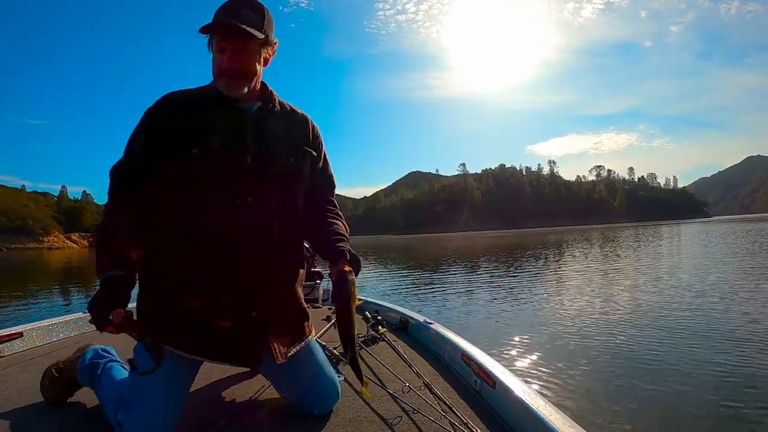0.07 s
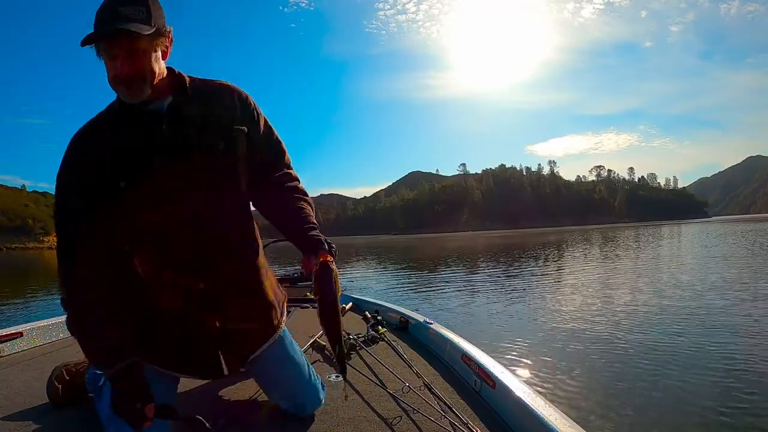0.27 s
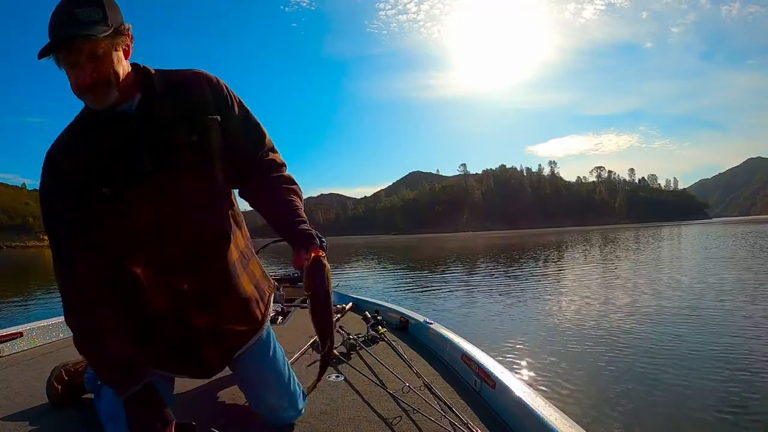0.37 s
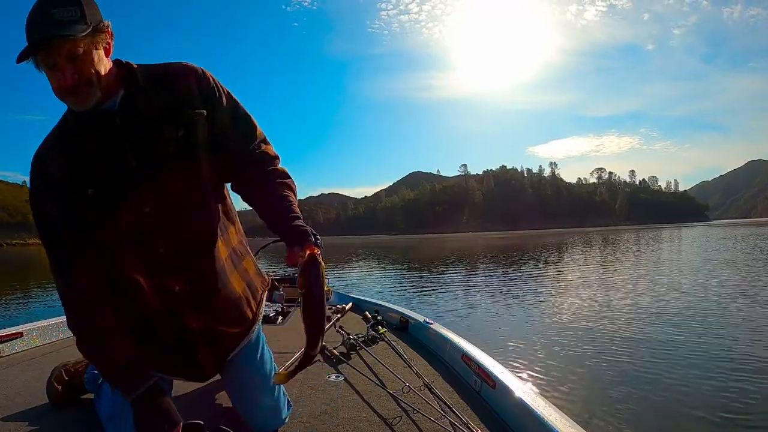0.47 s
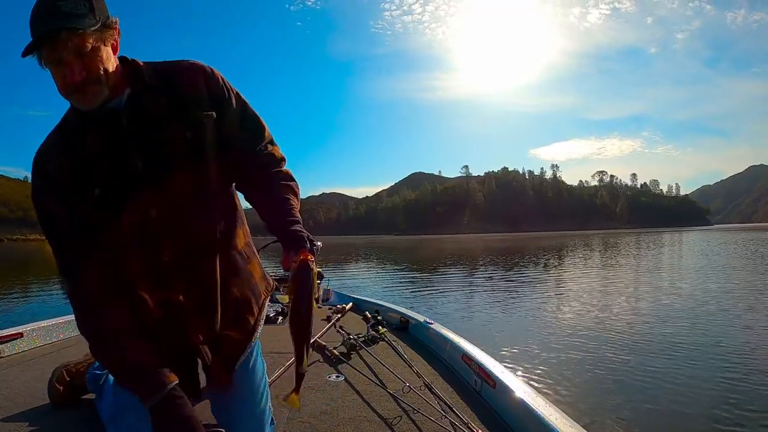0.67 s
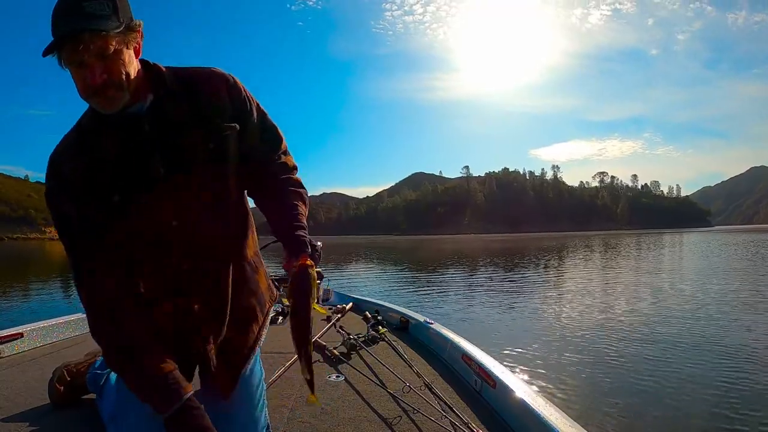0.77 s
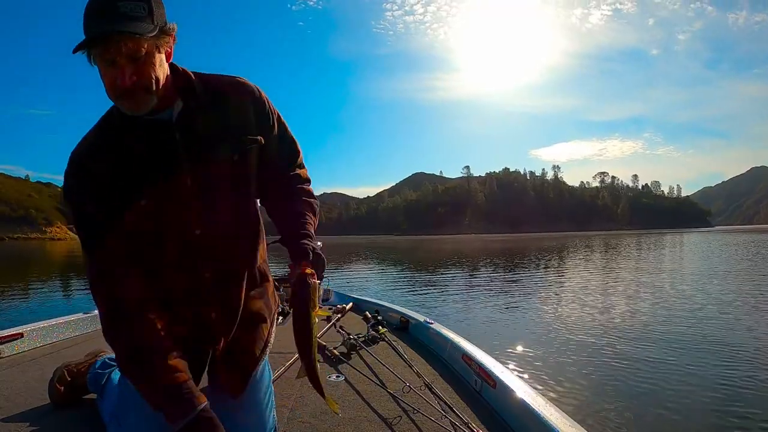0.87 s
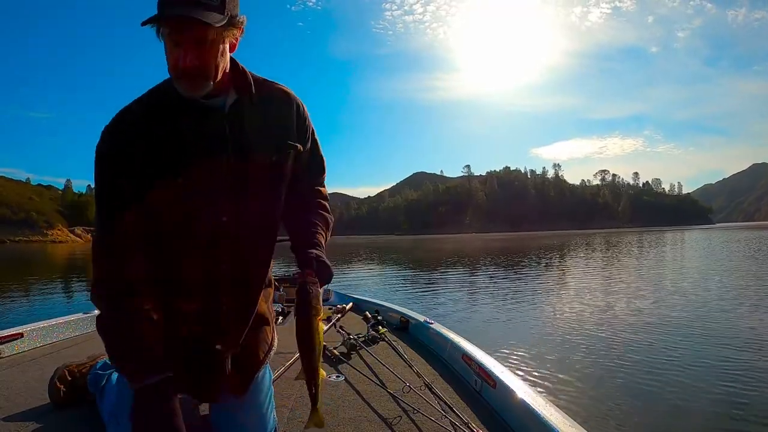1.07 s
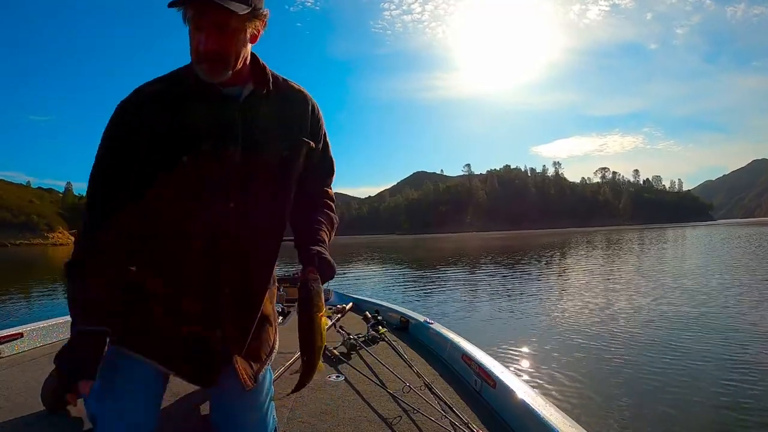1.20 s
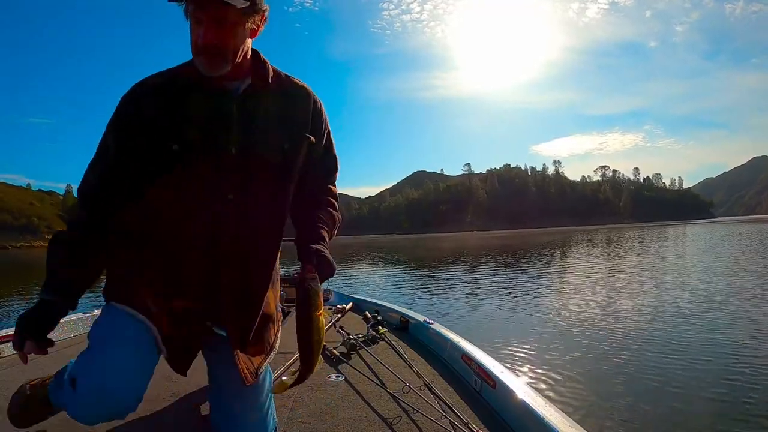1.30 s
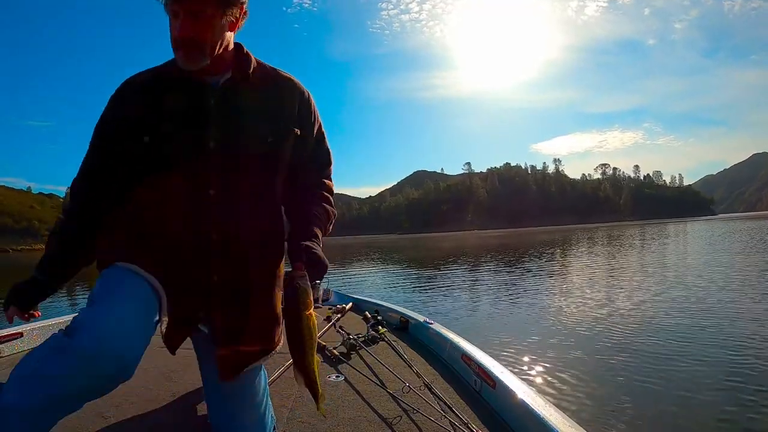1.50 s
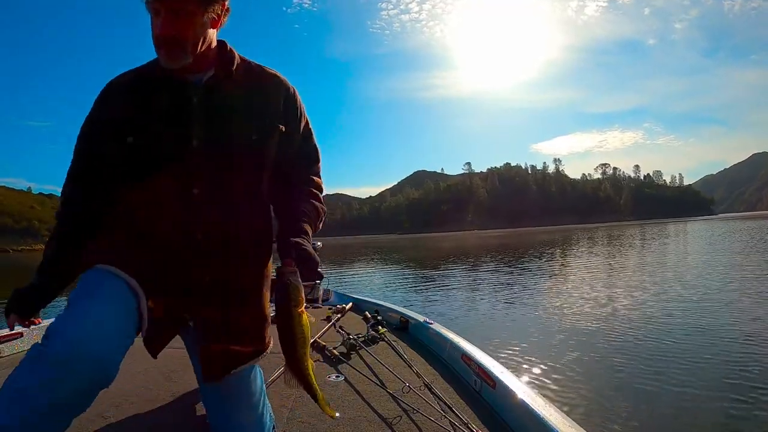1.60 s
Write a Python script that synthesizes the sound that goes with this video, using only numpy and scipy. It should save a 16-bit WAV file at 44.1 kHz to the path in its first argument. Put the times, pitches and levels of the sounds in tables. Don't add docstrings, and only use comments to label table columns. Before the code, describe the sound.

Knocks and thumps on a small boat's carpeted deck. A low thump opens, then a deep bump with a click at 0.2 s and duller knocks to 0.4. Cloth rubs around 0.4-0.6; a boot scrapes with a faint rising squeak at 0.65-0.85. After near quiet, a dropped tool cracks loudly at 1.07, bouncing with heavy thuds. Small bumps and a tick near 1.3-1.4 fade into faint lake hiss, close through the hull.

```python
import sys
import numpy as np
from scipy import signal
from scipy.fft import rfft, irfft
from scipy.io import wavfile
from scipy.ndimage import uniform_filter1d

SR = 44100
rng = np.random.default_rng(int(sys.argv[2]) if len(sys.argv) > 2 else 0)


def level_to_linear(level):
    exponent = np.asarray(level, float) / 20
    return 10 ** exponent


def digitize_waveform(pressure):
    field = np.atleast_2d(pressure).T
    bounded = np.clip(field, -1, 1)
    quanta = np.round(bounded * 32767).astype(np.int16)
    wavfile.write(sys.argv[1], SR, quanta)


N = 72765

# pitch_hz, level_db
AIR_COLOUR = [(120, -15), (190, -16.5), (860, -32), (1260, -25), (2400, -34.5), (7000, -29.5),
              (14000, -42.5)]
# pitch_hz, likeness_0_to_1
AIR_LIKENESS = [(60, 0.33), (240, 0.29), (950, 0.12), (3770, 0.63), (15000, 0.076)]
# start_s, top_s, end_s, level_db, brightness_db_per_octave
CLOTH_DRAGS = [
    (.23, .26, 0.34, -62, 3.5),
    (.3, .39, .49, -55, 1),
    (.345, .372, .42, -52.5, 1),
    (.475, .57, 0.65, -51.5, 1.5),
    (.8, .9, 0.98, -68, 2.5),
    (1.07, 1.095, 1.125, -50.5, -9),
    (1.314, 1.33, 1.39, -62.5, -0.5),
    (1.37, 1.53, 1.77, -74, 7.5),
]
# start_s, top_s, end_s, level_db, brightness_db_per_octave
BOOT_DRAGS = [
    (.14, .2, 0.35, -60, 3.5),
    (.635, .69, 0.745, -51.5, 2.5),
    (.68, .76, 0.84, -53, 0.5),
    (.9, .95, 1, -66.5, 4),
    (1.14, 1.2, 1.236, -60.5, 4.5),
    (1.285, 1.302, 1.3, -66, 0),
    (1.316, 1.328, 1.34, -57, 10.5),
]
# pitch_hz, level_db_per_hz
CLOTH_COLOUR = [(200, -6.5), (800, -3), (1300, 0), (2600, -7.5), (4200, -13.5), (6000, -11.5),
                (8000, -15.5), (13000, -17)]
# pitch_hz, level_db_per_hz
BOOT_COLOUR = [(200, 6.5), (800, -8), (1300, -1), (2600, -6), (3300, -10.5), (8600, -19), (11000, -35.5)]
# time_s, pitch_hz
SOLE_GLIDE = [(.63, 1474), (.7, 2211), (.76, 2363), (.82, 2776)]
# pitch_hz, level_db
SOLE_HOLLOW = [(2900, 0.5), (3200, -6), (3600, -2.5), (4300, 0.5)]
# start_s, peak_db, pitch_hz (minus: first
# swing down), fade_60db_s, rise_s
WEIGHT_SHIFTS = [(-.001, -36, 87.5, 0.15, 0.00022), (.033, -27.5, 90, 0.062, 0.0078),
                 (.085, -43.5, 85, 0.13, 0.0095), (.13, -58, 45, 0.51, .02), (.205, -32, -20, 0.12, 0.0031),
                 (.2255, -18.5, -26, 0.39, 0.0024), (.219, -17, 49, 0.23, 0.011),
                 (.277, -22.5, 32, 0.26, 0.01), (.295, -45.5, 109, 0.31, 0.0065),
                 (.33, -22, 44, 0.12, 0.011), (.365, -32, 68.5, 0.17, 0.0051),
                 (.41, -36, 33.5, 0.18, 0.0068), (.56, -53, 29, 0.56, 0.011), (.69, -35, 88, 0.23, 0.0085),
                 (.712, -23, 63, 0.22, 0.023), (.79, -36, 76, 0.21, 0.0062),
                 (.8405, -32, -30.5, 0.27, 0.0072), (.915, -37.5, 50, 0.073, 0.0037),
                 (.95, -52, 35.5, 0.39, 0.0085), (1.0859, -17, 79, 0.07, 0.0065),
                 (1.225, -40, 70.5, 0.12, 0.0031), (1.3, -38.5, 65, 0.1, 0.0064),
                 (1.318, -24, 46, 0.18, 0.013), (1.4, -37.5, 77, 0.054, 0.0047)]
# start_s, peak_db, pitch_hz, fade_60db_s, rise_s
LID_KNOCKS = [(.0, -43.5, 161, 0.11, 0.013), (.219, -33.5, 139, 0.19, 0.002),
              (.221, -38.5, 276, 0.066, 0.00039), (.222, -36, 428, 0.035, 0.00097),
              (.335, -33, 277, 0.071, 0.012), (.37, -39, 547, 0.055, 0.0048),
              (.26, -40.5, 219, 0.057, 0.0021), (.385, -42, 220, 0.055, 0.0022),
              (.47, -54, 106, 0.059, .004), (.59, -43, 359, 0.066, 0.0064),
              (.675, -39, 177.5, 0.11, 0.0061), (.745, -40, 227.5, 0.14, 0.0019),
              (.75, -39.5, 152.5, 0.11, 0.0035), (.82, -54.5, 164, 0.13, .004),
              (.945, -47, 338, 0.08, 0.0022), (.976, -44.5, 321, 0.086, 0.0081),
              (1.018, -55, 315.5, 0.51, 0.013), (1.0676, -19.5, 114, 0.059, 0.0016),
              (1.0834, -14.5, -105, 0.045, 0.011), (1.0927, -11, -108, 0.065, 0.0059),
              (1.0672, -27.5, -490, 0.036, 0.0002), (1.102, -37.5, 544, 0.08, 0.0058),
              (1.074, -40, 949, 0.043, 0.0022), (1.0838, -16, 342, 0.051, 0.0047),
              (1.128, -34, 94, 0.1, 0.0053), (1.155, -34, 132, 0.12, 0.0068),
              (1.21, -46.5, 153, 0.14, .004), (1.0845, -22.5, -225, 0.098, 0.0031),
              (1.2, -44, 197.5, .2, 0.0041), (1.12, -32.5, 151.5, 0.34, 0.0012),
              (1.175, -25.5, 110.5, 0.09, 0.0065), (1.183, -39.5, 271, 0.069, 0.0033),
              (1.325, -34, 213, 0.061, 0.0052), (1.365, -48.5, 130, 0.084, 0.0021),
              (1.41, -48.5, 181, 0.057, 0.0027), (1.56, -54.5, 183, 0.1, 0.002)]
# start_s, peak_db, softness_hz, ring_share_db, crack_fade_60db_s
TOOL_TAPS = [(0.2187, -38.5, 11600, -25, 0.026), (.2258, -41, 1150, 4, 0.015),
             (.947, -69, 5000, -19, 0.019), (1.044, -64.5, 3017, 5.5, 0.023), (1.0545, -52, 6040, 9, 0.01),
             (1.0653, -20, 9700, -7.5, 0.011), (1.0657, -21, 2940, 5, .012), (1.0726, -48, 7000, -5, 0.014),
             (1.084, -36.5, 8030, -5, 0.0083), (1.0979, -33.5, 6870, -8, 0.018),
             (1.104, -60, 6000, -14, 0.021), (1.3, -50.5, 2200, -10, .03), (1.408, -51, 2540, 1, 0.02)]
# pitch_hz, level_db, fade_60db_s
TOOL_TONES = [(552, -3, 0.057), (722, -11.5, 0.092), (1150, 2, 0.022), (1296, 1.5, 0.046),
              (1568, -1.5, 0.039), (1730, -5, 0.055), (1890, 10, 0.012), (2320, -9, 0.043),
              (3140, -23, 0.0065)]
# start_s, peak_db, pitch_hz, fade_60db_s, rise_s
SNAPS = [(.2186, -31, 2714, 0.0042, 0.00014), (.2205, -40, 2596, 0.0078, 0.0002),
         (.2203, -51, 6003, 0.012, 0.00059), (.2255, -35.5, 983, 0.028, 0.00089),
         (.2203, -44, 784, 0.033, 0.0012), (.9385, -52, 4497, 0.0098, 0.00049),
         (.2188, -54, 8998, 0.0063, 0.00022), (1.0653, -31, 3222, 0.019, 0.000095),
         (1.0653, -18.5, 5095, 0.0058, 0.000081), (1.0653, -18, 6995, 0.005, 0.00017),
         (1.0654, -25, 8299, 0.0079, .0002), (1.0655, -31, 11000, 0.0069, .0002),
         (1.0655, -25, 12900, 0.005, 0.00016), (1.0675, -26, -680, .03, 0.00017),
         (1.0735, -50, 7005, 0.0087, .0004), (1.084, -38.5, 2396, 0.01, 0.00049),
         (1.0983, -56, 4705, 0.011, .0003), (1.0985, -31.5, 1695, 0.015, 0.00047),
         (1.104, -48, 6998, 0.011, 0.00046), (1.3005, -52.5, 1295, 0.04, 0.00049),
         (1.302, -49.5, 2141, 0.02, .001), (1.4083, -45, 1307, 0.014, .0003),
         (1.4083, -42.5, 1850, 0.012, 0.00037)]
# pitch_hz, level_db
PORT_LEVELS = [(60, 0), (180, -4.5), (550, 0), (1650, 2.5), (2800, 6.5), (4970, 1.5), (15000, -1.5)]
# pitch_hz, phase_rad
PORT_PHASES = [(0, 0), (3450, -0.46), (5940, -0.44), (7150, -1.47), (10500, 1), (15700, -0.5)]
# pitch_hz, level_db
HOUSING_COLOUR = [(3000, 0.5), (3900, -4.5), (5500, -2), (7600, -7.5), (8700, -6.5), (9900, -15),
                  (11000, -14.5), (13500, -20.5), (15500, -32)]


def rms_one(x):
    return x / np.sqrt(np.mean(x ** 2) + 1e-20)


def at_hz(points, hz):
    table = np.array(points)
    return np.interp(np.log(hz), np.log(table[:, 0]), table[:, 1])


def pan(db):
    return level_to_linear(np.array([[db / 2], [-db / 2]]))


def drift(rate_hz):
    r = np.exp(-2 * np.pi * rate_hz * 40 / SR)
    noise = rng.standard_normal(N // 40 + 2002)
    slow = signal.lfilter([1], [1, -2 * r, r * r], noise)[2000:]
    return np.interp(np.arange(N) / 40, np.arange(len(slow)), rms_one(slow))


def filtered(x, kind, hz, order=2):
    return signal.sosfilt(signal.butter(order, hz, kind, fs=SR, output="sos"), x)


def spectrum_hz():
    return np.maximum(np.fft.rfftfreq(N, 1 / SR), 1)


def bands(noise, gain, alike):
    out = 0
    edges = 100 * 2 ** (np.arange(23) / 3)
    for k, (low, high) in enumerate(zip(edges, edges[1:])):
        mid, side = filtered(noise[k % 2], "band", [low, high])
        hz = np.sqrt(low * high)
        c = np.clip(alike(hz), 0, 1)
        stereo = np.sqrt(1 + c) * mid + np.sqrt(1 - c) * side * [[1], [-1]]
        out = out + gain(hz) * stereo
    return out


def lake():
    def air_gain(hz):
        return level_to_linear(at_hz(AIR_COLOUR, hz) + 2 * drift(1.36))

    air = bands(rng.standard_normal((2, 2, N)), air_gain, lambda hz: at_hz(AIR_LIKENESS, hz))
    lap = filtered(rng.standard_normal(N + SR), "band", [15, 72.6])[SR:]
    lap_level = level_to_linear(-71 + 0.78 * drift(4.6))
    return level_to_linear(-70.5 + 4.5) * pan(1.3) * rms_one(air) + lap_level * rms_one(lap)


def strokes(rows):
    depth_db, edge_curve = 15, 1.85
    t = np.arange(N) / SR
    levels = []
    for start, top, end, db, _ in rows:
        x = np.interp(t, [start, max(top, start + .002), max(end, top + .004)], [0, 1, 0])
        closed_ends_db = 20 * np.log10(np.minimum(8 * x, 1) + 1e-6)
        levels.append(db - depth_db * (1 - x) ** edge_curve + closed_ends_db)
    return levels


def scuffs(rows, colour):
    fibres_per_s, fibre_spread_db, rumble_db = 8000, 1.5, -16
    levels = strokes(rows)
    size = (2, 2, N)
    catches = rng.random(size) < fibres_per_s / SR
    strength = level_to_linear(fibre_spread_db * rng.exponential(1, size))
    grains = rms_one(catches * strength * rng.choice([-1, 1], size)) * level_to_linear(0.97 * drift(39))

    def gain(hz):
        octaves = np.log2(hz / 2000)
        swell = sum(level_to_linear(db + row[4] * octaves) for db, row in zip(levels, rows))
        return swell * level_to_linear(at_hz(colour, hz) + 9.5 + 0.74 * drift(16.0))

    rumble = rms_one(filtered(rng.standard_normal(N), "band", [140, 400]))
    return bands(grains, gain, lambda hz: 0.9) + level_to_linear(rumble_db) * rumble * sum(map(level_to_linear, levels))


def sole():
    t = np.arange(N) / SR
    grit = filtered(rng.standard_normal((2, N)), "low", 404, order=4)
    turn = 2 * np.pi * np.cumsum(np.interp(t, *np.transpose(SOLE_GLIDE))) / SR
    squeak = rms_one(grit[0] * np.cos(turn) + grit[1] * np.sin(turn)) * level_to_linear(1.5 * drift(29))
    stroke, = strokes([(.635, .76, 0.8416, -56.5, 0)])
    hollow = level_to_linear(at_hz(SOLE_HOLLOW, spectrum_hz()))
    scuff = irfft(rfft(scuffs(BOOT_DRAGS, BOOT_COLOUR)) * hollow, N)
    return scuff + level_to_linear(stroke) * squeak


def panels(rows):
    out = np.zeros(N)
    for start, db, hz, t60, rise in rows:
        t = np.maximum(np.arange(N) / SR - start, 0)
        swell = 1 - np.exp(-t / max(rise, 1e-4))
        out += level_to_linear(db - 60 * t / t60) * swell * np.sin(2 * np.pi * hz * t)
    return out


def hull():
    lids = panels(LID_KNOCKS)
    loose = rms_one(filtered(rng.standard_normal(N), "band", [60, 337], order=4))
    lid_motion = uniform_filter1d(np.abs(lids), size=900, origin=300)
    shudder = level_to_linear(-10.5) * loose * lid_motion
    return pan(2) * panels(WEIGHT_SHIFTS) + pan(1.65) * (lids + shudder)


def ring(clicks, hz, t60):
    r, w = level_to_linear(-60 / (t60 * SR)), 2 * np.pi * hz / SR
    return signal.lfilter([0, np.sin(w)], [1, -2 * r * np.cos(w), r * r], clicks + 1e-18)


def tool_taps():
    out = np.zeros(N)
    luck_db = rng.normal(0, 3, (len(TOOL_TAPS), len(TOOL_TONES)))
    span = SR // 5
    t = np.arange(span) / SR
    click = (t == 0) * 1.
    for (start, db, soft_hz, ring_db, t60), own_db in zip(TOOL_TAPS, luck_db):
        body = np.zeros(span)
        for k, (hz, level, ring_t60) in enumerate(TOOL_TONES):
            body += (-1) ** k * level_to_linear(level + own_db[k] + ring_db - 11.5) * ring(click, hz, ring_t60)
        hiss = signal.lfilter([1, -1], [1, -.85], rng.standard_normal(span)) / 2
        crack = level_to_linear(3.5 - 60 * t / t60) * (1 - np.exp(-t / 0.000081)) * hiss
        hit = filtered(body + crack, "low", min(soft_hz, 18000))
        i = int(start * SR)
        out[i:i + span] += level_to_linear(db) * hit[:N - i]
    return out


def snaps():
    return panels(SNAPS)


def ports(x):
    hz = spectrum_hz()
    half = level_to_linear(at_hz(PORT_LEVELS, hz) / 2) * np.exp(.5j * at_hz(PORT_PHASES, hz))
    return irfft(rfft(x * np.ones((2, 1))) * [half, 1 / half], N)


def scene():
    airborne = scuffs(CLOTH_DRAGS, CLOTH_COLOUR) + sole() + tool_taps() + snaps()
    return lake() + hull() + ports(airborne)


def top_cut(x):
    return signal.sosfilt(signal.butter(12, 16120, fs=SR, output="sos"), x)


def record(dry):
    housing = level_to_linear(at_hz(HOUSING_COLOUR, spectrum_hz()))
    mix = irfft(rfft(dry) * housing, N)
    return top_cut(mix)


dry = scene()
out = record(dry)
digitize_waveform(out)
```